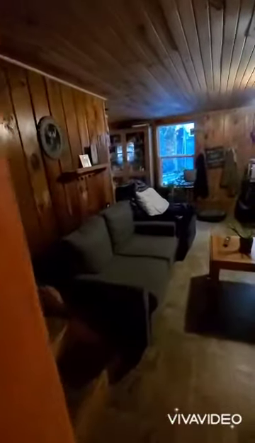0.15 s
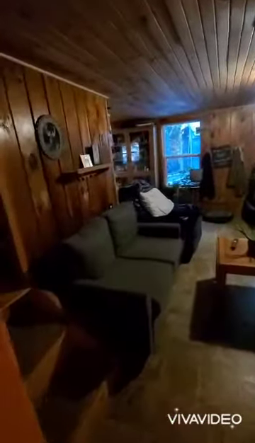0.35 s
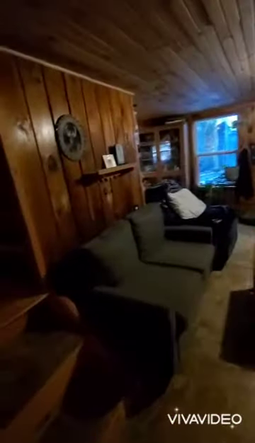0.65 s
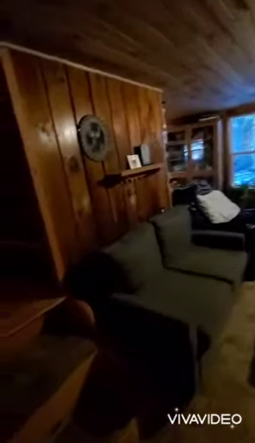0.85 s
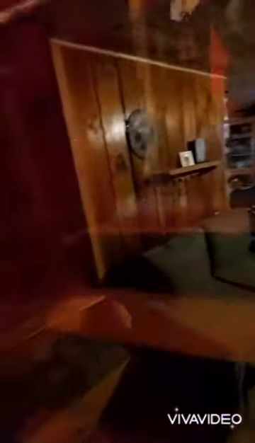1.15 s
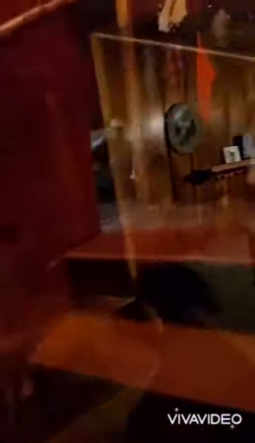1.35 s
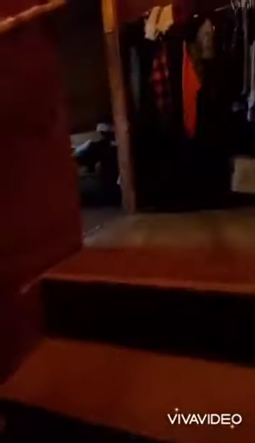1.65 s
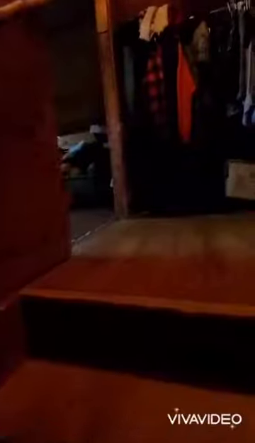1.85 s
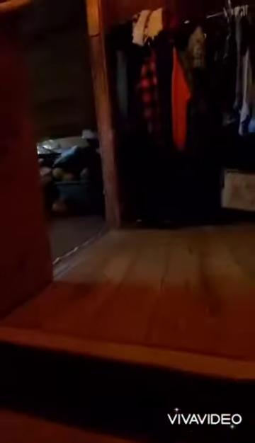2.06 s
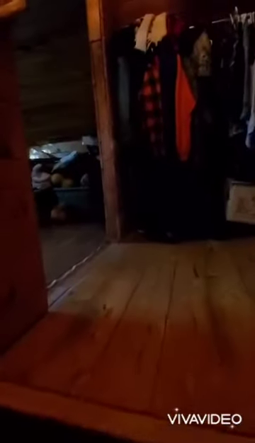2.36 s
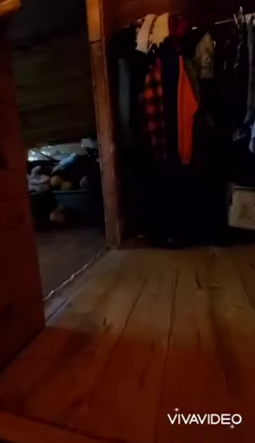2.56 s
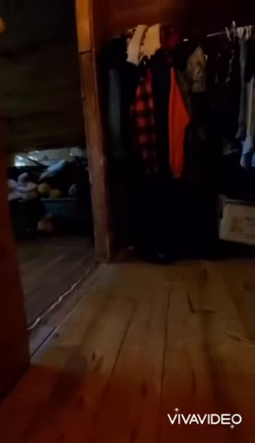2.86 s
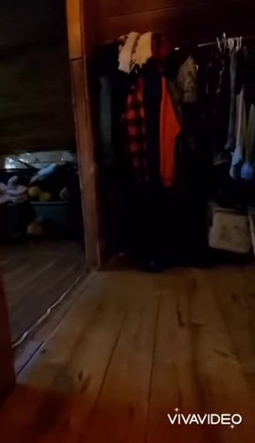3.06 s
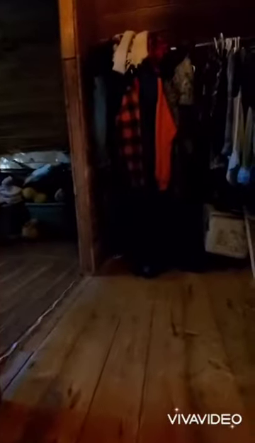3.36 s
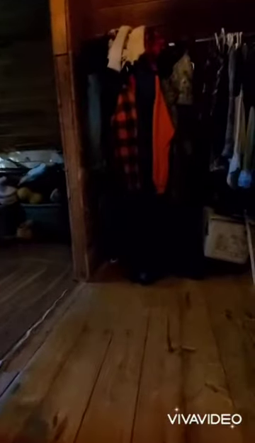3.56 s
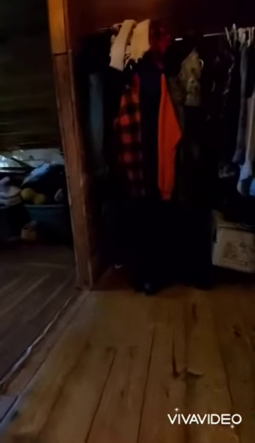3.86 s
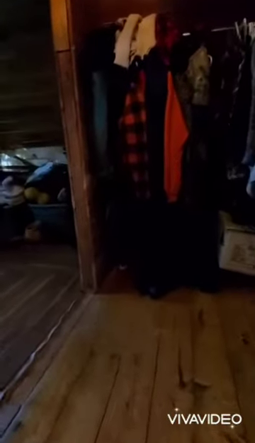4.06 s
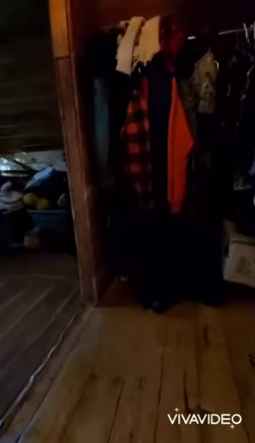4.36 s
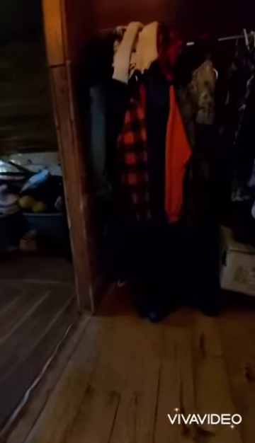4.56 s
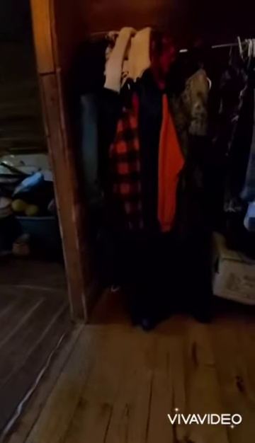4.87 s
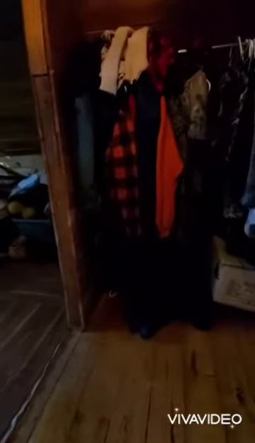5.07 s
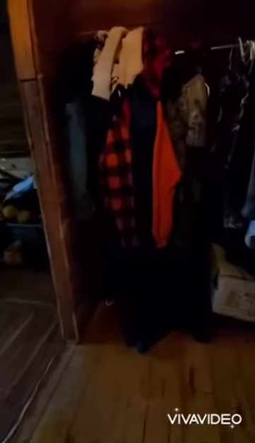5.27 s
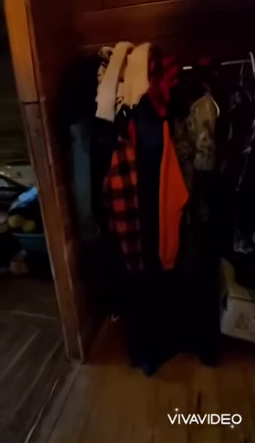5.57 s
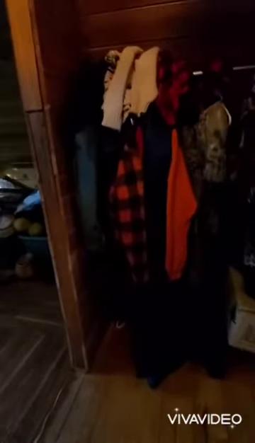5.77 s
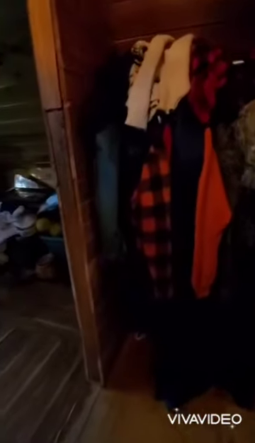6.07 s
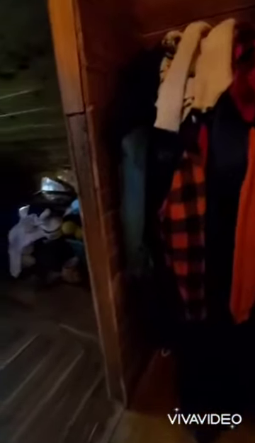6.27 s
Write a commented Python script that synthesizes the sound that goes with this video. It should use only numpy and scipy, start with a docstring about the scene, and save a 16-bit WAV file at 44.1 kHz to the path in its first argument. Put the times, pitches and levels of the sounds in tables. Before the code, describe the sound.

Inside a wooden house, a fan rushes and whines steadily, then fades behind a stairwell to a faint mains hum. Shoes climb the last treads with hollow knocks and scuffs, then cross a plank floor in uneven heel and toe thumps. A short rubber squeak chirps upward, then softer thuds and a faint drag follow before a last step. Close handheld phone, stereo, short woody room ring.

```python
"""Up the cabin stairs

Someone climbs the last wooden stairs of a cabin and walks onto the plank floor above, phone in hand.
Heels and toes knock, soles scuff and squeak: bursts of noise and fading tones, coloured by ringing wood.
A fan downstairs, made of noise and wavering tones, fades behind the stairwell, leaving a faint mains hum."""
import sys
import numpy as np
from scipy import signal
from scipy.fft import rfft, irfft, next_fast_len
from scipy.io import wavfile

SR = 44100
rng = np.random.default_rng(int(sys.argv[2]) if len(sys.argv) > 2 else 0)


def wav_out(sig):
    """Save sig, one row per channel (or a flat mono array), as 16-bit PCM at SR to the path in sys.argv[1]."""
    wavfile.write(sys.argv[1], SR, np.round(np.clip(np.atleast_2d(sig).T, -1, 1) * 32767).astype(np.int16))


N = 282681  # length in samples
TIME = np.arange(N) / SR
BANDS = 40 * 2 ** np.arange(0, 9, .5)  # half-octave band centres, Hz
PORT_LAG_MS = 0.4066  # steps reach the phone's left port later than its right, before the stretch below

# sound bends round the phone, so the lag between its ports changes with pitch: (pitch_hz, factor on the lag)
LAG_STRETCH = [(130, 0.69), (500, 1.29), (860, 1.197), (1500, 0.91), (2000, .9), (2800, 0.99), (4000, 0.99)]
# heels and toes knocking on the boards; level_db is set before the wood's modes are added:
# (start_s, level_db, thump_db, sole_hardness_db, tick_db, rise_ms, contact_ms, boom_hz, boom_db,
#  note_hz, note_db, first_overtone_hz, second_overtone_hz, third_overtone_hz, overtone_db)
FOOT_KNOCKS = [(1.212, -45, -7, 7, 4.5, 2.2, 7.4, 134, -47, 454, -44, 756, 1210, 2250, -49),
               (1.312, -36.5, -27, -9, -2, 2, 12, 177, -37, 363, -44, 872, 1560, 2562, -51),
               (1.331, -28.5, -4, 3, 3, 1.5, 4.7, 126, -40, 531, -31, 880, 1570, 2590, -27),
               (2.062, -30, -1.5, 2.5, -4, 0.85, 19, 98, -25, 537, -28, 784, 1430, 2780, -26),
               (2.149, -28, -7, 3, 7, 1.5, 20, 200.6, -32, 416, -29, 797, 1280, 2360, -25),
               (2.224, -25, -4.5, 3, 6, 1.5, 4.7, 200.4, -27.5, 501, -18, 850, 2030, 2400, -27.5),
               (2.66, -25.5, -5, 4.5, 6, 2.1, 15.6, 210.4, -22.5, 533, -17, 823, 1300, 2620, -22),
               (2.753, -31, -0.5, 0.5, -2.5, 3, 15, 198, -30, 395, -34, 710, 1460, 2920, -30),
               (2.944, -21.5, -5.5, -4, -4.5, 4.3, 16, 196, -26, 527, -20, 835, 1300, 2718, -22),
               (3.135, -22.5, 3, 1, 4, 1.7, 17, 137, -51, 478, -17, 986, 1510, 2740, -24),
               (3.349, -21, 1.5, 0, 4.5, 4, 20.6, 133.4, -26.5, 535, -14.5, 657, 1550, 2700, -25.5),
               (3.564, -29.5, -6, -6.5, -3, 1.7, 53, 295, -39, 560, -38, 651, 1685, 2510, -42),
               (3.851, -25, -2, 2.5, -5.5, 1.1, 14.4, 135, -34, 491, -28, 622, 1300, 2788, -27),
               (4.237, -19.5, -12.5, -2.5, -0.5, 3.1, 12, 166.4, -30.5, 510, -24.5, 1030, 1752, 2465, -22),
               (4.330, -23.5, -6, -3, 1.5, 2.6, 15, 172.3, -30, 613, -26, 1000, 1250, 2580, -37),
               (4.455, -47, 5, -3.5, 7.5, 2.7, 16, 173, -59, 395, -51, 1006, 1275, 2519, -58),
               (4.523, -42, 7, -10, -6, 3, 54, 165, -54, 494, -42, 794, 1300, 2480, -56),
               (5.151, -43, 0.5, 2, -4, 2.2, 17, 166, -53, 294, -39.5, 706, 1350, 2691, -42),
               (5.33, -41, -4, 5.5, 9.5, 1.5, 22, 167, -58, 290, -36, 806, 1350, 3041, -38),
               (5.379, -41.5, 5.5, -3, 0, 2.5, 31, 114, -56, 464, -47, 930, 1162, 2440, -49),
               (6.155, -33.5, -6.5, -12, -8, 6.4, 22, 197.4, -40.5, 500, -28, 829, 1420, 2420, -39),
               (6.174, -32.5, -20, 0.5, 1.5, 1.8, 21, 199, -57, 638, -27, 806, 2067, 2480, -36)]
# boards thudding softly as weight shifts onto them; level_db is set before the wood's modes are added:
# (start_s, level_db, thump_db, boom_hz, boom_db)
SOFT_THUDS = [(2.427, -47, 3.5, 130, -37.5), (2.53, -57, 5, 115, -41), (2.59, -60, 9.5, 135, -48),
              (2.903, -30, 0, 148, -34), (3.691, -37, 3, 146, -28.5), (3.775, -29.5, 1, 163, -24),
              (3.807, -24, -6, 160, -27), (4.091, -54, 18, 169.6, -34), (4.626, -42, 18, 269, -42.5),
              (4.674, -55, 11, 175, -45), (5.465, -47.5, 9, 264, -32), (5.492, -46, 15, 292, -30),
              (5.528, -38, -1, 289, -33), (5.618, -51.5, 18, 131, -54)]


def undb(db):
    """Turn decibels into gain."""
    return 10 ** (np.asarray(db) / 20)


def at(table, hz):
    """Read (pitch_hz, value) points, joined by straight lines on a log-frequency axis."""
    f, value = np.transpose(table)
    return np.interp(np.log(np.maximum(hz, 1)), np.log(f), value)


def unit(x):
    """Scale to rms 1."""
    return x / np.sqrt(np.mean(x ** 2))


def walk(rate, size=N):
    """Random values, rate a second, joined by straight lines."""
    place = np.arange(size) * rate / SR
    return np.interp(place, np.arange(8192), rng.standard_normal(8192))


def resonate(x, hz, width):
    """A ringing band-pass, width in Hz, with gain 1 at its centre."""
    return signal.lfilter(*signal.iirpeak(hz, hz / width, SR), x)


def add(out, s, sound):
    """Mix a sound in at time s."""
    i = int(s * SR)
    out[:, i:i + sound.shape[1]] += sound[:, :N - i]


def port_noise(lag_ms):
    """Half-octave noises (band, port, time): ports share part of the sound, a positive lag delays the left."""
    # how much of the sound the ports share: (pitch_hz, share of power 0-1)
    likeness = [(60, .99), (130, .96), (300, .76), (700, .8), (1200, .84), (2200, .55), (4000, .5),
                (8000, .45), (15000, .35)]
    size = next_fast_len(N, True)
    f = np.arange(size // 2 + 1) * SR / size
    common, left, right = rfft(rng.standard_normal((3, size)))
    share = np.clip(at(likeness, f), 0, 1)
    delay_s = lag_ms * at(LAG_STRETCH, f) / 1000
    direct = np.array([common * np.exp(-2j * np.pi * f * delay_s), common])
    own = np.array([left, right])
    pair = (np.sqrt(share) * direct + np.sqrt(1 - share) * own).astype(np.complex64)
    octave = np.log2(np.maximum(f, 1)).astype(np.float32)
    bands = []
    for hz in BANDS:
        # power falls in a straight line to nothing half an octave away
        power = np.maximum(1 - 2 * abs(octave - float(np.log2(hz))), 0)
        bands.append(unit(irfft(pair * np.sqrt(power), size)[:, :N]))
    return np.array(bands)


def air(spectrum, lag_ms, flicker_db):
    """Rushing air: coloured noise whose bands each flicker a little."""
    gains = undb(at(spectrum, BANDS)) * np.sqrt(BANDS)  # a wider band holds more noise
    return unit(sum(g * band * undb(flicker_db * walk(6.9)) for g, band in zip(gains, port_noise(lag_ms))))


def tones(table, lag_ms, waver_db):
    """Machine tones that waver as the phone moves through their standing waves."""
    out = np.zeros((2, N))
    heard = TIME - np.array([[lag_ms / 1000], [0]])
    for hz, width, db in table:
        phase = 2 * np.pi * hz * heard + walk(2 * width)  # drifting phase blurs the pitch
        out += np.sqrt(2) * undb(db + waver_db * walk(14)) * np.sin(phase)
    return out


def fan(whine_hz=3170, whine_width_hz=170):
    """Air noise, motor tones, a rough whine and a thin whistle from the room below."""
    # the fan as the stairwell hides it: (time_s, level_db added to air, tones and whine)
    stairwell_level = [(0, 4), (.9, 1), (1.25, -2), (1.85, -15), (6.41, -17.5)]
    # colour of its rushing air: (pitch_hz, level in dB per Hz)
    fan_spectrum = [(35, -29), (70, 4), (130, 3), (200, -3), (480, 8), (800, -2), (1200, 8.5), (1550, 0),
                    (2000, -6.5), (3200, -13), (4000, -20.5), (6000, -20.5), (8000, -50), (14000, -34)]
    # motor and blade tones, before the stairwell: (pitch_hz, width_hz, level_db)
    motor_tones = [(118.3, 2.6, -55.5), (239.8, 2.9, -58.5), (317, 3.1, -60), (362, 1.6, -64.5),
                   (553.3, 2.5, -54.5), (579.5, 4.1, -62), (656, 8.4, -59.5), (727, 4.6, -63),
                   (786, 4.5, -69), (1186, 6, -56), (1380, 4, -56), (3040, 10, -62.5), (3234, 14, -65.5)]
    whistle_peak_s, rise_db_per_s, fade_db_per_s = 0.44, 39, 30

    rush = undb(-42.0) * air(fan_spectrum, lag_ms=-0.31, flicker_db=1.0)
    motor = tones(motor_tones, lag_ms=-0.26, waver_db=0.5)
    # noise through the same narrow band twice
    whine = resonate(rng.standard_normal((2, N)), whine_hz, whine_width_hz)
    whine = unit(resonate(whine, whine_hz, whine_width_hz)) * undb(-61 + 4 * walk(14))
    whistle = tones([(3133, 14, -57)], lag_ms=-.3, waver_db=4)
    since_peak = TIME - whistle_peak_s
    swell_db = np.minimum(rise_db_per_s * since_peak, -fade_db_per_s * since_peak)
    hidden = undb(np.interp(TIME, *np.transpose(stairwell_level)))
    return (rush + motor + whine) * hidden + whistle * undb(swell_db)


def upstairs(whine_hz=3180, whine_width_hz=220):
    """The upper room: quiet air noise, mains hum and a faint, rough whine."""
    # the room opens up as the stairs are climbed: (time_s, level_db added to all of it)
    opening_level = [(0, -5), (1.1, -2.5), (1.75, 2.5), (6.41, 3)]
    # colour of the still air: (pitch_hz, level in dB per Hz)
    still_air = [(25, -12), (60, 4.5), (90, -4.5), (200, -11.5), (500, -16.5), (1200, -16.5), (2200, -22.5),
                 (3200, -31), (4200, -29), (6500, -20), (8300, -64), (10000, -44.5), (14000, -33)]
    # mains hum, before the opening level: (pitch_hz, width_hz, level_db)
    hum_tones = [(61.3, 2.9, -59.5), (122, 3.4, -73)]
    whine = unit(resonate(rng.standard_normal((2, N)), whine_hz, whine_width_hz)) * undb(-71.5 + 2 * walk(16))
    hush = undb(-57.5) * air(still_air, lag_ms=0.421, flicker_db=-0.5)
    hum = tones(hum_tones, lag_ms=.1, waver_db=-2.0)
    return (hush + hum + whine) * undb(np.interp(TIME, *np.transpose(opening_level)))


def clicks():
    """Small dry clicks of grit and board joints: a bright noise snap with a short trail from the room."""
    # when each click comes: (start_s, level_db)
    click_times = [(1.135, -48), (1.214, -41.5), (1.890, -71), (2.225, -35), (2.946, -34), (3.788, -36),
                   (3.811, -38), (3.821, -38), (3.852, -31.5), (4.832, -55), (5.93, -61)]
    snap_ms, tail_ms, tail_db = 0.52, 26.5, -10.5
    out = np.zeros((2, N))
    ms = 1000 * np.arange(SR // 8) / SR
    shape = np.exp(-ms / snap_ms) + undb(tail_db) * np.exp(-ms / tail_ms)
    band = signal.butter(1, [1500, 7000], "band", fs=SR, output="sos")
    for s, db in click_times:
        noise = unit(signal.sosfilt(band, rng.standard_normal((2, len(ms)))))
        add(out, s, undb(db) * shape * noise)
    return out


def squeals():
    """Rubber rings in one narrow band while it bites, then dies away in the room."""
    # brief squeals and low groans as a sole bites: (start_s, length_s, pitch_hz, level_db)
    bites = [(1.209, 0.0065, 2000, -43), (2.799, 0.033, 741, -33), (2.799, .025, 1142, -38),
             (2.845, 0.0097, 353, -35), (2.872, 0.059, 319, -32.5), (4.093, 0.02, 242, -40.5),
             (4.12, .012, 275, -46.5), (4.544, 0.018, 4940, -49.5), (4.544, .006, 2800, -44),
             (4.559, 0.014, 2206, -36), (4.573, .008, 3200, -35), (4.635, 0.012, 475, -38),
             (5.439, 0.008, 2480, -48), (5.475, 0.019, 2510, -57)]
    width_share, t60_s = 0.031, 0.098  # width as a share of the pitch; time to fall 60 dB
    out = np.zeros((2, N))
    t = np.arange(SR // 4) / SR
    heard = t - np.array([[PORT_LAG_MS / 1000], [0]])
    for s, length, hz, db in bites:
        drift = np.array([walk(2 * width_share * hz, len(t)) for _ in range(2)])
        phase = 2 * np.pi * hz * heard + drift
        fade = np.exp(-np.log(1000) * np.maximum(t - length, 0) / t60_s)
        shape = (1 - np.exp(-t / 0.0015)) * fade
        add(out, s, np.sqrt(2) * undb(db) * shape * np.sin(phase))
    return out


def wood_gains(thump_db, hardness_db, tick_db):
    """Band gains of a contact, the body of the boards at 1: weight adds thump, a hard sole adds crack and tick."""
    # colour of a blow on the boards: (pitch_hz, level in dB per Hz)
    wood_colour = [(40, 1), (70, 3), (120, -1.5), (250, -3), (500, -1.5), (900, 3), (1600, -9), (2700, -21),
                   (3800, -21.5), (5200, -27.5), (8000, -42), (10000, -37.5), (15000, -47)]
    # the boards are too small to give much deep bass, however heavy the foot
    most_deep_db = 10
    gains = undb(at(wood_colour, BANDS)) * np.sqrt(BANDS)
    body = np.sqrt(np.sum(gains[(BANDS > 300) & (BANDS < 1000)] ** 2))
    contact = [(55, min(3.9 * thump_db, most_deep_db)), (120, min(thump_db, most_deep_db)),
               (200, thump_db), (380, 0), (800, 0.0058),
               (1500, hardness_db), (2500, hardness_db), (5000, tick_db)]
    return gains / body * undb(at(contact, BANDS))


def excite(bank, push, held, gains, grain_db, grain_rate):
    """Boards driven by a grainy push for held s, then dying away, the bass slowest."""
    # ring of boards and stairwell: (pitch_hz, time to fall 60 dB in s)
    wood_ring = [(60, 0.58), (130, 0.45), (250, 0.18), (560, 0.19), (1500, .17), (4000, 0.16),
                 (12000, 0.15)]
    size = len(push)
    start = rng.integers(N - size)  # a random stretch of the noise
    after = np.maximum(np.arange(size) / SR - held, 0)
    # graininess grows up to 1500 Hz
    grain = np.clip(BANDS / 1500, 0, 1)[:, None] * grain_db * walk(grain_rate, size)
    decay = np.log(1000) * after / at(wood_ring, BANDS)[:, None]
    shape = push * np.exp(np.log(10) / 20 * grain - decay)
    bands = bank[:, :, start:start + size] * shape[:, None].astype(np.float32)
    early = int(max(held, .04) * SR)
    # each band's level is set over the contact, or over 40 ms if that is longer
    loudness = np.sqrt(np.mean(bands[:, :, :early] ** 2, axis=(1, 2)))
    return np.tensordot((gains / loudness).astype(np.float32), bands, 1)


def blow(bank, gains, contact_ms, rise_ms):
    """A foot meets a board: the push rises quickly and lasts as long as the contact."""
    ms = 1000 * np.arange(SR // 2) / SR
    push = 1 - np.exp(-ms / max(rise_ms, .2))
    return excite(bank, push, contact_ms / 1000, gains, grain_db=1.5, grain_rate=760)


def grit(size):
    """Uneven grip of a sole sliding over grains; mean power 1."""
    per_s, spread_db, grain_ms, grain_share = 260, 3, 4.3, .58
    sizes_db = spread_db * np.minimum(rng.exponential(size=size), 3)
    sizes = (rng.random(size) < per_s / SR) * undb(sizes_db)
    power = signal.lfilter([1], [1, -np.exp(-1000 / (grain_ms * SR))], sizes ** 2)
    share = np.clip(grain_share, 0, 1)
    return np.sqrt(1 - share + share * power / power.mean())


def crunch(size, held):
    """Fine grains snap under the sole and merge into a rough hiss while it drags."""
    per_s, spread_db = 550, 3.5
    centre_hz, width_hz, t60_s = 4800, 1300, 0.022
    t = np.arange(size) / SR
    sizes_db = spread_db * np.minimum(rng.exponential(size=size), 3)
    snaps = (rng.random(size) < per_s / SR) * undb(sizes_db)
    # each snap is a sharp tick with a weaker, longer tail
    fall = np.exp(-t[:2048] * 2500) + .15 * np.exp(-np.log(1000) * t[:2048] / t60_s)
    trail = rng.standard_normal((2, 2048)) * fall
    steady = resonate(signal.fftconvolve(snaps[None], trail, axes=1)[:, :size], centre_hz, width_hz)
    hiss = unit(resonate(steady, centre_hz, 2 * width_hz))
    return hiss * np.exp(-np.log(1000) * np.maximum(t - held, 0) / t60_s)


def scuff(bank, gains, held, rub_hz, rub_db):
    """A sole catches and slips over grit as the weight comes on, with one rubbing resonance."""
    rise_share, swell_db, crunch_db = 0.14, -0.5, 1  # rise time as a share of the drag; change over the drag
    t = np.arange(SR // 2) / SR
    weight = (1 - np.exp(-t / (rise_share * held))) * undb(swell_db * np.minimum(t / held, 1))
    grip = np.where(t < held, grit(len(t)), 1)
    sound = excite(bank, weight * grip, held, gains, grain_db=2.0, grain_rate=900)
    # the crunch is as strong as the contact's own treble at 4800 Hz
    grains = undb(crunch_db) * np.interp(4800, BANDS, gains) * weight * crunch(len(t), held)
    return sound + undb(rub_db) * resonate(sound, rub_hz, rub_hz / 5) + grains


def boards(x, modes, plain_db, faint_db=-6, count=26):
    """Strong modes and a scatter of faint high ones stand out of the wood's dense plain response."""
    strong = sum(undb(db) * resonate(x, hz, width) for hz, width, db in modes)
    # one faint mode somewhere in each slice of the treble
    slices = (np.arange(count) + rng.random(count)) / count
    faint = sum(resonate(x, hz, hz / 70) for hz in 1900 * 2 ** (2.6 * slices))
    return undb(plain_db) * x + strong + undb(faint_db) * faint


def footsteps(stiff_hz=135):
    """Knocks, thuds and scuffs drive the wood, first the stair treads and then the floor planks."""
    # soles dragging; level_db is set before rubbing, crunch and the wood's modes are added:
    # (start_s, end_s, level_db, thump_db, sole_hardness_db, hiss_db, rubbing_hz, rubbing_db)
    drags = [(2.167, 2.202, -23.5, -2, 2.5, 1, 955, -5), (2.80, 2.852, -33.5, -18, 1, -5.5, 740, 3),
             (2.821, 2.925, -29, -11, -2, -1.5, 1660, 3.5), (3.641, 3.714, -28, -13, 1, 4.5, 2580, -6),
             (3.685, 3.815, -25, 0.5, 2, 5, 1560, -17), (4.548, 4.554, -37, -40, 4.5, 5.5, 1500, 7),
             (4.575, 4.63, -41.5, 4.5, 3.5, 6, 2100, -4), (5.438, 5.536, -36, 7, -8, -13, 333, 2),
             (5.63, 5.928, -58, 3.5, -0.5, 3, 222, 8)]
    # ways the stair treads ring: (pitch_hz, width_hz, level_db)
    tread_modes = [(96, 15, -17), (136, 19, -3.5), (201.6, 26.5, 6), (329, 13.5, 0), (396, 27, -4.5),
                   (514, 10.5, -1.5), (780, 22, -11), (959, 11, -5.5), (1295, 76, 0.5), (1440, 140, -4),
                   (1643, 25, 0.5), (1847, 47, 3.5), (2400, 71, -15), (2750, 380, -5)]
    # ways the floor planks ring: (pitch_hz, width_hz, level_db)
    plank_modes = [(137, 15, -8), (176.7, 11, -4.5), (287, 9, -10), (321.8, 10.5, 1), (360, 57, -7.5),
                   (465, 35, -1.5), (521, 8.2, -10), (584.6, 16, 0), (659, 16, -3), (775, 13, -3.5),
                   (980, 34, -6.5), (1100, 10, -16), (1305, 39, 3), (1490, 170, 1), (1660, 16, -3),
                   (1814, 95, 0.5), (1984, 32, -2), (2500, 105, -1), (2800, 174, -2), (5270, 400, -10.5)]
    top_stair_s = 3.05
    treads, planks = np.zeros((2, 2, N))
    bank = port_noise(PORT_LAG_MS)

    def underfoot(s):
        """The wood stepped on at time s."""
        return treads if s < top_stair_s else planks

    for s, db, thump_db, hardness_db, tick_db, rise_ms, contact_ms, *_ in FOOT_KNOCKS:
        gains = wood_gains(thump_db, hardness_db, tick_db)
        add(underfoot(s), s, undb(db) * blow(bank, gains, contact_ms, rise_ms))
    for s, db, thump_db, *_ in SOFT_THUDS:
        gains = wood_gains(thump_db, hardness_db=-5, tick_db=-13)
        add(underfoot(s), s, undb(db) * blow(bank, gains, contact_ms=7.5, rise_ms=2.6))
    for s, end, db, thump_db, hardness_db, hiss_db, rub_hz, rub_db in drags:
        gains = wood_gains(thump_db, hardness_db, hiss_db)
        add(underfoot(s), s, undb(db) * scuff(bank, gains, max(end - s, .01), rub_hz, rub_db))
    # the planks lie stiffly on joists and give less deep bass than the open treads
    planks = signal.sosfilt(signal.butter(2, stiff_hz, "high", fs=SR, output="sos"), planks)
    return boards(treads, tread_modes, plain_db=-4.0) + boards(planks, plank_modes, plain_db=-7.0)


def ring(hz, t60, rise_ms):
    """One board mode swells under the foot and dies away; the left port hears it late."""
    lag_ms = np.array([[PORT_LAG_MS * at(LAG_STRETCH, hz)], [0]])
    ms = np.maximum(1000 * np.arange(SR // 4) / SR - lag_ms, 0)
    t = ms / 1000
    return (1 - np.exp(-ms / rise_ms)) * np.exp(-np.log(1000) * t / t60) * np.sin(2 * np.pi * hz * t)


def board_notes():
    """Every board has its own low boom; a knock also wakes its hollow note and its overtones."""
    # parts of the hollow note: (ratio to the note, level_db added to the note's, time to fall 60 dB in s)
    note_parts = [(1, 3.5, .13), (1.52, -7, .11)]
    # level added to each of the three overtones (dB)
    overtone_trim = [-2, -3, -12.5]
    # each overtone is a close, beating pair: (ratio to it, level_db added, time to fall 60 dB in s)
    beating_pair = [(1, 0, .12), (1.045, -6, .08)]
    out = np.zeros((2, N))

    def boom(hz, db):
        """The board's lowest mode."""
        return undb(db) * ring(hz, t60=0.27, rise_ms=5.5)

    for s, *_, boom_hz, boom_db, note_hz, note_db, first_hz, second_hz, third_hz, over_db in FOOT_KNOCKS:
        sound = boom(boom_hz, boom_db)
        for ratio, db, t60 in note_parts:
            sound += undb(note_db + db) * ring(ratio * note_hz, t60, rise_ms=12)
        for hz, trim_db in zip((first_hz, second_hz, third_hz), overtone_trim):
            for ratio, db, t60 in beating_pair:
                sound += undb(over_db + trim_db + db) * ring(ratio * hz, t60, rise_ms=1.6)
        add(out, s, sound)
    for s, *_, boom_hz, boom_db in SOFT_THUDS:
        add(out, s, boom(boom_hz, boom_db))
    return out


def squeak(shake_db=4.5, t60=0.22, direct_db=-4, room_db=-6):
    """Rubber chirps upward in uneven slips, a stack of 12 harmonics smeared by the room."""
    # colour of the rubber: (pitch_hz, level_db)
    rubber_colour = [(500, -10), (1100, -5.5), (1500, 7), (2200, 3), (2800, 0), (3300, -8), (4200, -6),
                     (6000, -18), (10000, -26), (15000, -41)]
    start_s, level_db = 4.545, -25  # level before the direct and room shares
    low_hz, top_hz, glide_s, rough = 661, 1095, 0.035, .05  # rough: random share of the pitch
    attack_s, hold_s, release_s = 0.025, 0.016, 0.0087
    t = np.arange(SR // 4) / SR
    rate = low_hz * (top_hz / low_hz) ** np.minimum(t / glide_s, 1)
    phase = 2 * np.pi * np.cumsum(rate * (1 + rough * walk(1195, len(t)))) / SR
    slips = sum(undb(at(rubber_colour, k * rate)) * np.sin(k * phase) for k in range(1, 13))
    released = np.maximum(t - attack_s - hold_s, 0)
    pressure = np.minimum(t / attack_s, 1) ** 2 * np.exp(-released / release_s)
    source = unit(slips * undb(shake_db * walk(596, len(t)))) * undb(level_db) * pressure
    # the room is a fading noise that smears the chirp
    room = rng.standard_normal((2, len(t))) * np.exp(-np.log(1000) * t / t60)
    room /= np.sqrt(np.sum(room ** 2) / 2)
    smeared = signal.fftconvolve(source[None], room, axes=1)[:, :len(t)]
    out = np.zeros((2, N))
    add(out, start_s, undb(direct_db) * source + undb(room_db) * smeared)
    return out


def scene():
    """Steps, clicks and squeaks over the sounds of the house."""
    house = fan() + upstairs()
    return house + clicks() + squeals() + footsteps() + board_notes() + squeak()


def record(dry, dip_db=-6):
    """The phone's right port is duller than its left, both dip in the high treble, and the top is cut."""
    # how the ports differ: (pitch_hz, left minus right in dB)
    port_balance = [(60, 0), (180, -0.3), (450, 0), (1300, -0.4), (2400, 4.5), (4400, 6.5), (8000, 5.5),
                    (15000, 8)]
    size = next_fast_len(N + 4096, True)
    f = np.arange(size // 2 + 1) * SR / size
    ports = undb(np.array([[.5], [-.5]]) * at(port_balance, f))
    ports /= np.sqrt(np.mean(ports ** 2, axis=0))  # keep the power of the pair
    dip = undb(at([(7300, 0), (8200, dip_db), (9100, 0.015)], f))
    sound = irfft(rfft(dry, size) * ports * dip, size)[:, :N]
    # steep cut above 15850 Hz
    return signal.sosfilt(signal.ellip(10, .2, 80, 15850, fs=SR, output="sos"), sound)


dry = scene()
out = record(dry)
wav_out(out)
```